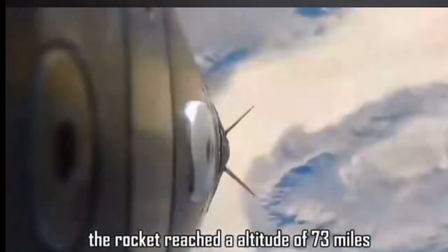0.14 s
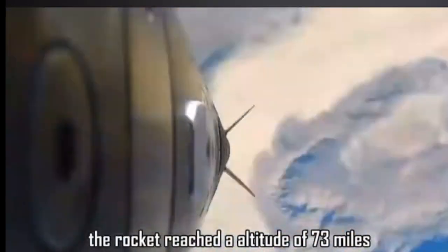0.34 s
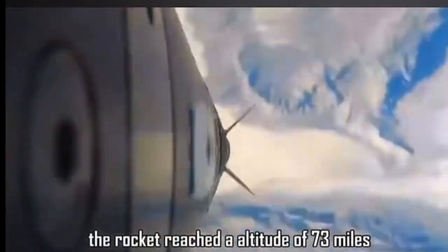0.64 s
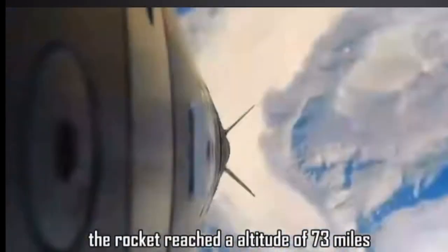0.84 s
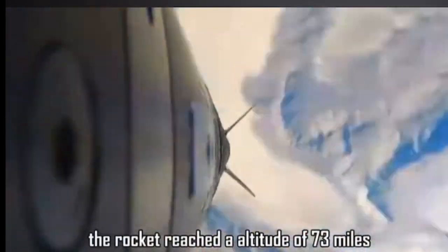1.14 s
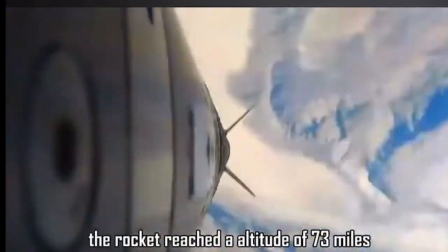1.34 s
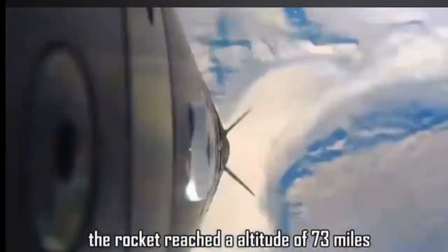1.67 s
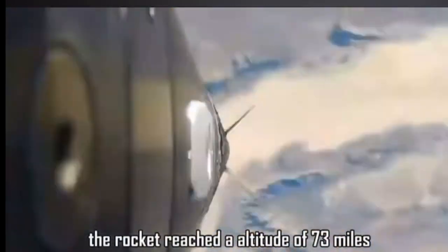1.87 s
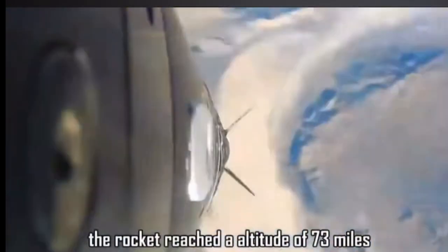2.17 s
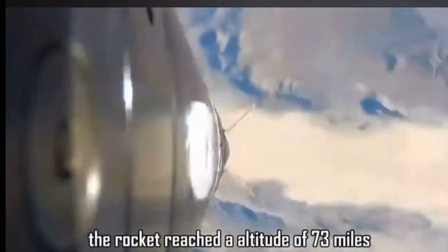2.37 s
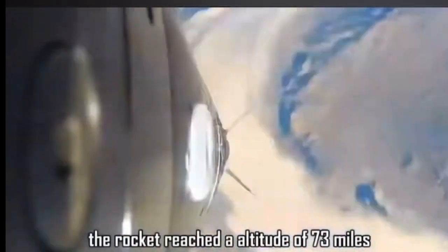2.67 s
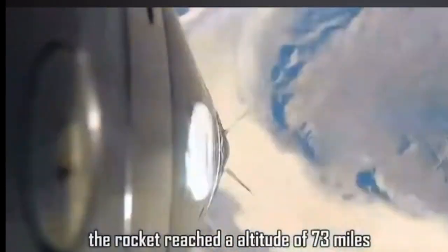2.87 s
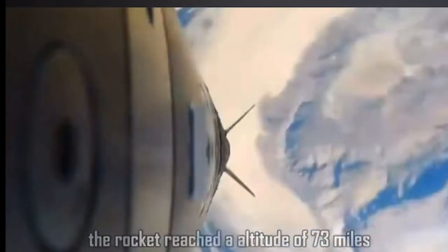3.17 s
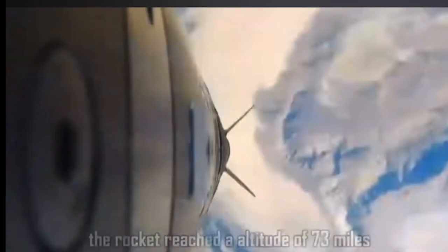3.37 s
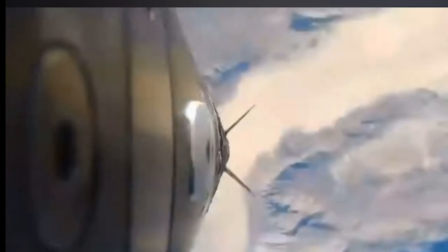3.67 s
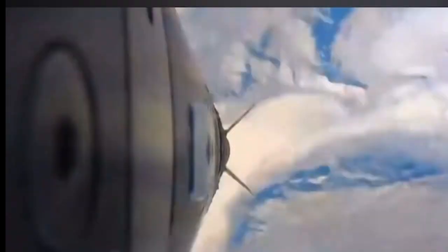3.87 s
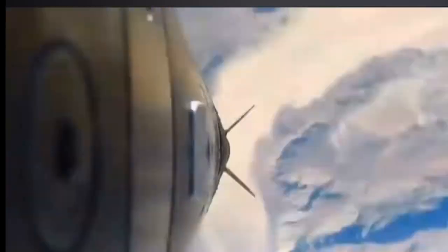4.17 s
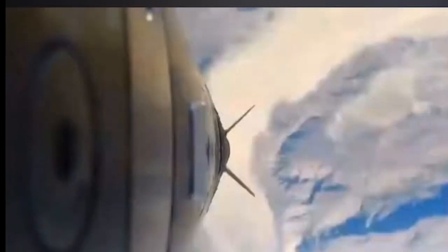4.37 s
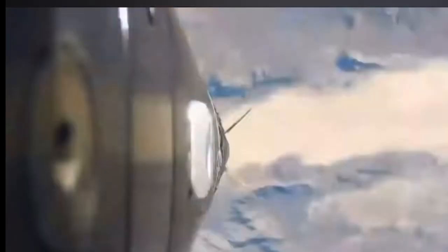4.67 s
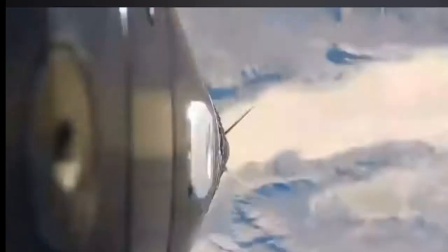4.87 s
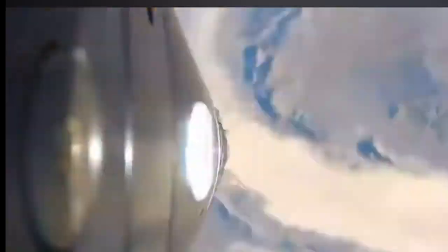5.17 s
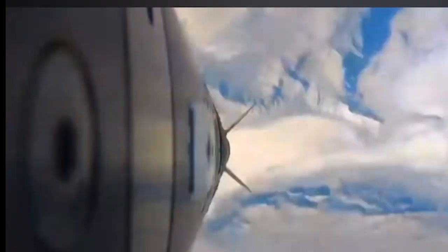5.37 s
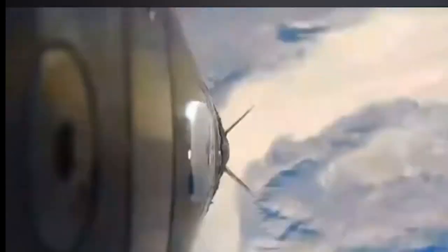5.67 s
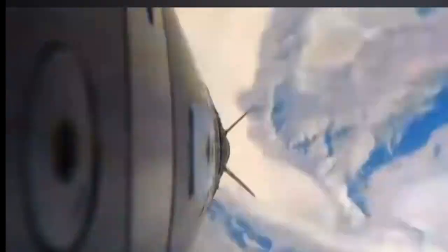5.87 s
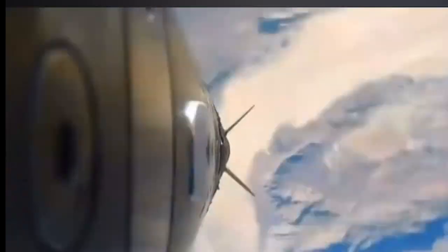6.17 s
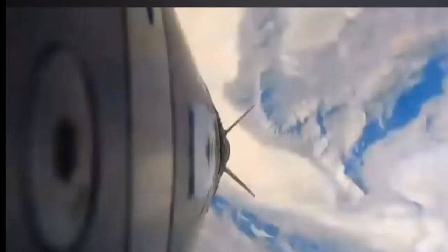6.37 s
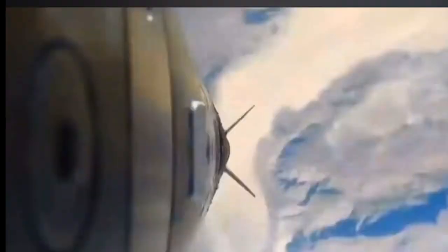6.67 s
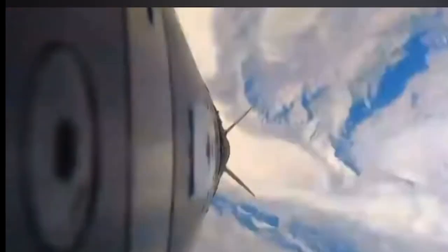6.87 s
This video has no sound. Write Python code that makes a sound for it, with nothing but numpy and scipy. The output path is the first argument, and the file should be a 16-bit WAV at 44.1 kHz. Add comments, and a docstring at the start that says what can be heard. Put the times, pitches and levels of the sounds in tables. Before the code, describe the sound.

A rocket's rushing roar with dull wind buffets, heard from on board, fades gradually, with one short clunk near the end.

```python
"""Camera on a climbing rocket

Turbulence shakes the camera housing and buffets it in dull thuds. Roar, port rumble and the rush
of air in the cavities die away with the air pressure, leaving a thin hiss. Near the end a double
clunk runs through the airframe, which hums on briefly. The camera's sample-and-hold adds sizzle."""
import sys
import numpy as np
from scipy import signal
from scipy.fft import rfft, irfft
from scipy.io import wavfile
from scipy.ndimage import uniform_filter1d

SR = 44100
rng = np.random.default_rng(int(sys.argv[2]) if len(sys.argv) > 2 else 0)


def transcribe(u):
    """Save the signal u as a 16-bit wav file named by the first command-line argument.

    u: samples, shape (n,) or (channels, n), limited to [-1, 1]; the rate is SR.
    q: integer samples, one column per channel.
    """
    v = np.clip(np.atleast_2d(u).T, -1, 1)
    q = np.round(v * 32767).astype(np.int16)
    wavfile.write(sys.argv[1], SR, q)


N = 310023

# hiss spectrum: f/Hz, width/Hz, level/dB
HISS_BANDS = [(827, 63, -0.5), (2454, 270, -5), (3170, 340, -3.5), (3845, 27, -1.5), (4230, 340, -0.5),
              (4820, 200, -6.5), (5300, 190, -2.5), (5700, 580, -7)]
# rumble spectrum at the microphone port: f/Hz, width/Hz, level/dB
PORT_BANDS = [(21.8, 6.8, 4.5), (54, 49, -2)]
# gusts: centre t/s, length/s, rise/dB
GUST_SWELLS = [(2.1, 0.83, 3), (3, 0.12, 13), (3.165, 0.18, 14), (3.305, 0.12, 6), (4.42, 0.14, 10),
               (4.56, 0.099, 6), (4.7, 0.093, 9)]
# cavity resonances: f/Hz, width/Hz, start level/dB, extra fade/(dB/s)
CAVITY_MODES = [(1202, 93, -2.5, 0), (1540, 132, -8, 0.1), (1857, 89, 2.5, 1.2), (2075, 96, 0, 0),
                (2232, 72, 2, -0.34), (2526, 170, -3.5, -0.05), (3040, 420, -6.5, 0), (3720, 67, -12, -1),
                (4120, 370, -22, -2), (5320, 580, -16, 0)]
# airframe knocks: t/s, thud level/dB, thud edge/Hz, tick level/dB, tick edge/Hz
FRAME_KNOCKS = [(6.4734, -26, 620, -41, 1500), (6.4807, -26, 725, -62, 900), (6.4878, -28, 560, -51, 2600),
                (6.499, -19, 437, -41.5, 3800), (6.5087, -26, 430, -66, 900), (6.5166, -30, 430, -70, 900)]
# contact tick spectrum: f/Hz, width/Hz, level/dB
TICK_BANDS = [(1190, 120, -6), (2200, 290, -4), (3520, 740, -10)]
# airframe modes: f/Hz, level/dB, t60/s
AIRFRAME_MODES = [(173, -17.5, 0.18), (269, -26, 0.14), (292.4, -4, 0.079), (398, -17.5, 0.09),
                  (495, -8, 0.05), (650, -4.5, 0.03), (777, -19, 0.07)]
# bending modes of the long body: f/Hz, level/dB, t60/s
BENDING_MODES = [(55.7, -40, .15), (58.5, -55, .95), (61.9, -50, .95)]
# housing wall resonances: f/Hz, width/Hz, level/dB
WALL_MODES = [(161.6, 39, -12), (245, 6.3, -4), (297.6, 38, 0.46), (356.5, 19.2, 0), (397.4, 15.5, -3.5),
              (502.5, 45, -9), (582, 27, -15.5), (646.8, 29.7, -7), (695.3, 11.6, -10), (748, 75, -14),
              (920, 84, -31)]
# buffets on the housing: t/s, relative level/dB, upper edge/Hz
BUFFET_BLOWS = [(0.029, 18, 535), (0.236, 17.5, 540), (0.3, 19, 560), (0.325, 12, 560), (0.467, 13.5, 750),
                (0.562, 16, 780), (0.65, 15.5, 620), (0.868, 21.5, 470), (1.038, 11.5, 600),
                (1.077, 16.5, 560), (1.195, 16, 600), (1.357, 13.5, 600), (1.503, 16, 500),
                (1.606, 16, 546), (1.793, 15.5, 540), (1.937, 17.5, 560), (2.096, 17, 560),
                (2.254, 13.5, 480), (2.425, 14.5, 480), (2.696, 18.5, 520), (2.846, 15.5, 500),
                (3.003, 15, 480), (3.475, 20, 480), (3.612, 14, 540), (3.66, 16.5, 480), (3.757, 14, 520),
                (3.913, 19, 535), (4.069, 13, 600), (4.226, 22, 560), (4.395, 20, 450), (4.55, 13, 560),
                (4.845, 13, 664), (5.007, 18.5, 500), (5.455, 23, 430), (5.479, 17.5, 557),
                (5.854, 16.5, 450), (6.108, 13, 430), (6.137, 16, 500), (6.373, 18, 640), (6.586, 18, 480),
                (6.639, 18.5, 540), (6.671, 15, 540), (6.695, 15, 420), (6.781, 15.5, 660),
                (6.951, 17.5, 640)]

TIME_S = np.arange(N) / SR


def from_db(db):
    """Decibels to gain."""
    return 10 ** (np.asarray(db) / 20)


def unit_rms(x):
    """Scale to rms 1."""
    return x / np.sqrt(np.mean(x ** 2) + 1e-20)


def low_pass(x, hz, order=2):
    """Butterworth low-pass."""
    return signal.sosfilt(signal.butter(order, hz, fs=SR, output="sos"), x)


def drift(rate_hz):
    """Slow random curve, rms about 1."""
    hop, settle = 40, 2000
    pole = np.exp(-2 * np.pi * rate_hz * hop / SR)
    noise = rng.standard_normal(N // hop + settle + 2)
    slow = signal.lfilter([1], [1, -2 * pole, pole * pole], noise)[settle:]
    return np.interp(np.arange(N) / hop, np.arange(len(slow)), unit_rms(slow))


def response(bands, size=8192):
    """Unit-energy impulse response of steep-sided resonances."""
    hz = np.arange(size // 2 + 1) * SR / size
    power = sum(from_db(db) ** 2 / (1 + ((hz - centre_hz) / width_hz) ** 2) ** 2
                for centre_hz, width_hz, db in bands)
    cepstrum = irfft(np.log(power + 1e-14) / 2)
    cepstrum[1:size // 2] *= 2  # fold to minimum phase
    cepstrum[size // 2 + 1:] = 0
    impulse = irfft(np.exp(rfft(cepstrum)))
    return impulse / np.sqrt(np.sum(impulse ** 2))


def convolve(force, impulse):
    """Convolution cut to N samples."""
    return signal.fftconvolve(force, impulse)[:N]


def click(at_s, level_db):
    """Single-sample impulse."""
    force = np.zeros(N)
    force[round(at_s * SR)] = from_db(level_db)
    return force


def soft_push(at_s, level_db, low_hz, high_hz):
    """Padded blow: a band-passed click."""
    band = signal.butter(2, [low_hz, high_hz], "band", fs=SR, output="sos")
    return signal.sosfilt(band, click(at_s, level_db) + 1e-18)


def ring(force, hz, t60_s):
    """One mode: a unit click starts a decaying unit sine."""
    radius = from_db(-60 / (t60_s * SR))
    angle = 2 * np.pi * hz / SR
    return signal.lfilter([0, np.sin(angle)], [1, -2 * radius * np.cos(angle), radius ** 2], force + 1e-18)


def turbulence(swell_db, rate_hz):
    """White pressure noise that swells and sags as eddies pass."""
    return unit_rms(rng.standard_normal(N) * from_db(swell_db * drift(rate_hz)))


def steady(x, share, window_s=0.02):
    """Partly level short swells toward the half-second mean power."""
    power = uniform_filter1d(x ** 2, round(window_s * SR)) + 1e-20
    mean_power = uniform_filter1d(power, SR // 2)
    return x * (mean_power / power) ** (share / 2)


def hull_echo(x, level_db, delay_s):
    """One short reflection inside the hull ripples the spectrum."""
    return x + from_db(level_db) * np.pad(x, (round(delay_s * SR), 0))[:N]


def hiss(start_db, fade_db_per_s):
    """Thin, even hiss, fading slowly."""
    gain = from_db(start_db - fade_db_per_s * TIME_S)
    return convolve(gain * turbulence(swell_db=0.78, rate_hz=21), response(HISS_BANDS))


def gusts_db():
    """Each gust lifts the level in a half-cosine arch."""
    return sum(rise_db * np.cos(np.pi * np.clip((TIME_S - centre_s) / length_s, -0.5, 0.5))
               for centre_s, length_s, rise_db in GUST_SWELLS)


def port_rumble(level_db):
    """Slow pressure lumps at the microphone port, swelling in gusts."""
    pressure = from_db(level_db + gusts_db()) * rng.standard_normal(N)
    return convolve(pressure, response(PORT_BANDS))


def cavity_rush(level_db):
    """Fine turbulence excites the cavities; each flares and fades on its own."""
    rush = np.zeros(N)
    for hz, width_hz, start_db, fade_db_per_s in CAVITY_MODES:
        cavity = convolve(turbulence(swell_db=1.67, rate_hz=17), response([(hz, width_hz, 0)]))
        rush += from_db(start_db - fade_db_per_s * TIME_S) * np.sqrt(width_hz) * cavity
    return from_db(level_db) * unit_rms(rush)


def body_hum(waver_db):
    """The hardest knock bends the long body; its close modes beat and waver."""
    hardest_s = max(FRAME_KNOCKS, key=lambda knock: knock[1])[0]
    hum = sum((-1) ** k * ring(click(hardest_s, db), hz, t60_s)
              for k, (hz, db, t60_s) in enumerate(BENDING_MODES))
    return hum * from_db(waver_db * drift(rate_hz=25))


def contact_ticks(t60_s, rise_s=0.002, lead_s=0.0015):
    """Each knock touches with a soft noise burst just ahead of its thud."""
    age_s = np.arange(SR // 10) / SR
    envelope = np.minimum(age_s / rise_s, 1) * from_db(-60 * age_s / t60_s)
    burst = envelope * rng.standard_normal(len(age_s))
    touches = sum(low_pass(click(at_s - lead_s, tick_db), edge_hz)
                  for at_s, _, _, tick_db, edge_hz in FRAME_KNOCKS)
    return convolve(convolve(touches, burst), response(TICK_BANDS))


def frame_thuds():
    """Padded knocks ring the airframe modes."""
    force = sum(soft_push(at_s, thud_db, low_hz=198, high_hz=edge_hz)
                for at_s, thud_db, edge_hz, _, _ in FRAME_KNOCKS)
    frame = sum(ring(force * from_db(db), hz, t60_s) for hz, db, t60_s in AIRFRAME_MODES)
    return low_pass(frame, hz=890, order=4)


def buffets(level_db):
    """Single blows of air thud on the housing walls."""
    walls = response(WALL_MODES)
    force = sum(soft_push(at_s, db, low_hz=218, high_hz=edge_hz) for at_s, db, edge_hz in BUFFET_BLOWS)
    return -convolve(from_db(level_db) * force, walls / np.abs(walls).max())


def housing_roar(level_db, tilt_db_per_db, gust_share):
    """Eddies shake the walls. Stronger flow favours small, bright ones; gusts feed the large."""
    eddies = from_db(level_db) * turbulence(swell_db=0.86, rate_hz=27)
    large = low_pass(eddies, hz=482, order=1)
    small = eddies - large
    tilt = from_db(tilt_db_per_db * (level_db - np.mean(level_db)))
    pressure = large / tilt * from_db(gust_share * gusts_db()) + small * tilt
    return steady(convolve(pressure, response(WALL_MODES)), share=0.2)


def scene():
    """Mono mix inside the housing; the flow weakens as the air thins."""
    start_db, thinning_db_per_s = -37.5, 2.5
    flow_db = start_db - thinning_db_per_s * TIME_S
    relative_db = flow_db - np.mean(flow_db)
    roar = housing_roar(flow_db + 1.5, tilt_db_per_db=0.41, gust_share=0.15)
    rumble = port_rumble(-63.5 + 1.03 * relative_db)
    clunk = frame_thuds() + contact_ticks(t60_s=0.043) + body_hum(waver_db=3.5)
    rush = cavity_rush(-58 + 1.17 * relative_db)
    air = hull_echo(rush + hiss(start_db=-55, fade_db_per_s=0.98), level_db=-21.5, delay_s=0.00265)
    return (air + rumble + clunk + buffets(flow_db - 1) + roar)[None]


def fade_treble(x, edge_hz, start_db, fade_db_per_s):
    """The band above edge_hz fades out over the first seconds, slightly dulling the whole sound."""
    top = signal.sosfilt(signal.butter(10, edge_hz, "high", fs=SR, output="sos"), x)
    return low_pass(x, edge_hz, order=16) + top * from_db(start_db - fade_db_per_s * TIME_S)


def record(dry, clock_hz=12000, anti_alias_hz=5850, notch_width_hz=300, cutoff_hz=14400):
    """Sample-and-hold mirrors the sound into the treble; circuit noise and a clock notch are added, and the
    topmost band fades out over the first seconds."""
    anti_alias = signal.ellip(8, 0.2, 60, anti_alias_hz, fs=SR, output="sos")
    samples = signal.resample_poly(signal.sosfilt(anti_alias, dry), clock_hz, SR, axis=1)
    steps = np.repeat(samples, 4, axis=1)
    held = signal.resample_poly(steps, SR, 4 * clock_hz, axis=1)[:, :N]
    circuit_noise = from_db(-68.5) * low_pass(rng.standard_normal(N), hz=6800)
    notch = signal.iirnotch(clock_hz, clock_hz / notch_width_hz, fs=SR)
    notched = signal.lfilter(*notch, held + circuit_noise)
    dulled = fade_treble(notched, edge_hz=12950, start_db=-3.5, fade_db_per_s=5.5)
    return signal.sosfilt(signal.ellip(10, 0.2, 80, cutoff_hz, fs=SR, output="sos"), dulled)


dry = scene()
out = record(dry)
transcribe(out)
```